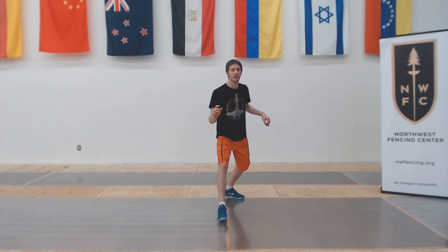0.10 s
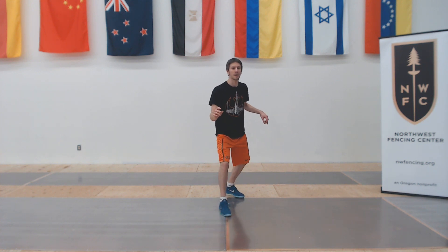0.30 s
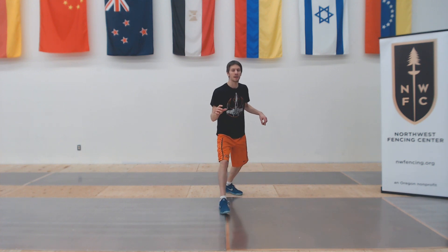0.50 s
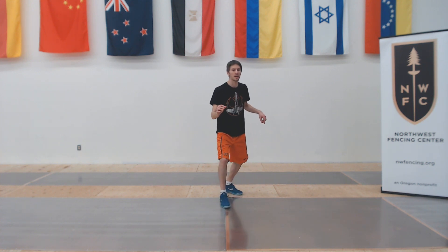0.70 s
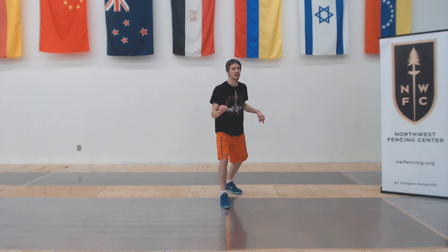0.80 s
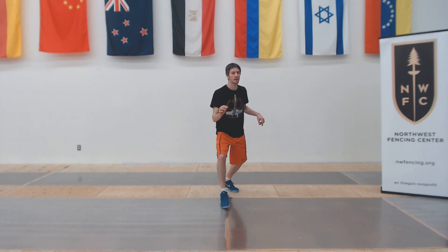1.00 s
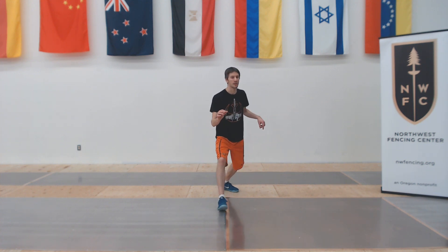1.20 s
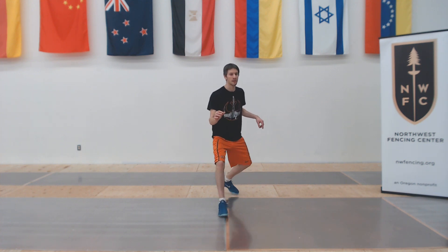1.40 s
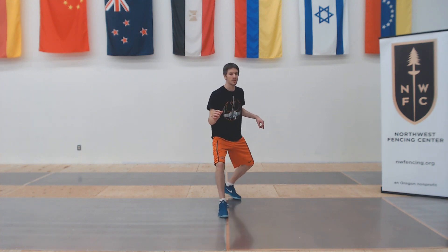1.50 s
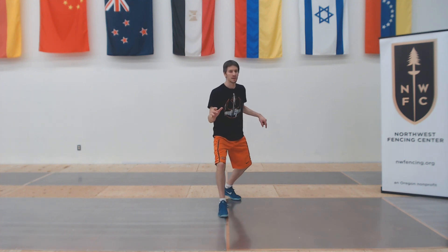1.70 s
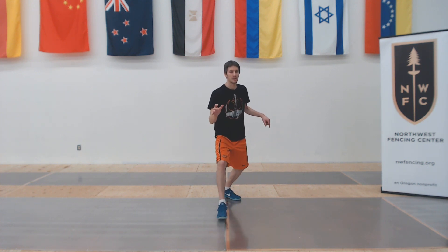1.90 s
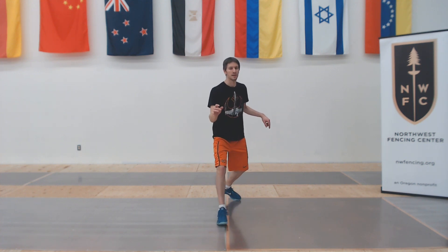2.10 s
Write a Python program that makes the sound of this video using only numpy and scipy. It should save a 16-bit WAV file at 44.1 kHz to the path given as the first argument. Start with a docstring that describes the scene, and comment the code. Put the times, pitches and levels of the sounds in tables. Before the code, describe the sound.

A rubber shoe sole squeaks sharply twice on a hall floor, amid soft scuffs and thuds

```python
"""A rubber sole squeaks twice in a large sports hall, while shoes scuff and pad softly before, between and after.
Each squeak is a pair of short stick-slip tones; an earlier one is still fading at the start.
Scuffs are gritty filtered noise; footfalls add a damped low sine to noise knocks and ticks.
The hall answers by convolution with echoes and a tail of over a second in the squeaks' range.
Ventilation lies underneath as wavering hum tones, low rumble and faint hiss."""
import sys
import numpy as np
from scipy import signal
from scipy.fft import rfft, irfft, next_fast_len
from scipy.io import wavfile

SR = 44100
rng = np.random.default_rng(int(sys.argv[2]) if len(sys.argv) > 2 else 0)


def unload_wav(signal):
    """Save mono or channel-first audio to the path in sys.argv[1] as 16-bit WAV at rate SR, clipped to [-1, 1]."""
    wavfile.write(
        sys.argv[1],
        SR,
        np.round(np.clip(np.atleast_2d(signal).T, -1, 1) * 32767).astype(np.int16),
    )


N = 94815
LEAD_S = 0.8  # least time computed ahead of zero, so that earlier sound can ring on
LEAD = next_fast_len(N + int(LEAD_S * SR), True) - N
T = (np.arange(N + LEAD) - LEAD) / SR  # scene time, s
EVENT_S = 0.25  # room for one contact
AGE = np.arange(int(EVENT_S * SR)) / SR  # time since an event began, s


def undb(db):
    """Amplitude ratio from a level: 20 dB is a factor of ten."""
    return 10 ** (np.asarray(db) / 20)


def unit(x):
    """Normalize the mean power: rms 1."""
    return x / np.sqrt(np.mean(x ** 2))


def unit_energy(x):
    """Normalize the total energy of an impulse response to 1."""
    return x / np.sqrt(np.sum(x ** 2))


def freqs(x):
    """Spectral frequency axis in Hz, floored at 1 Hz to allow logarithms."""
    return np.maximum(np.fft.rfftfreq(len(x), 1 / SR), 1)


def along(points, hz):
    """Interpolate (Hz, value) points linearly in log frequency, hence evenly per octave."""
    f, v = np.array(points, float).T
    return np.interp(np.log(hz), np.log(f), v)


def noise(t, gain):
    """Spectral shaping: white noise weighted at each frequency, rms 1."""
    spectrum = rfft(rng.standard_normal(len(t)))
    return unit(irfft(spectrum * gain, len(t)))


def wander(t, hz):
    """Random modulation: low-passed noise up to a rate, rms 1."""
    return noise(t, 1 / (1 + (freqs(t) / hz) ** 4))


def envelope(length, attack, release):
    """Linear rise, hold until a given age, then exponential decay."""
    rise = np.clip(AGE / attack, 0, 1)
    return rise * np.exp(-np.maximum(AGE - length, 0) / release)


def add(track, start, sound):
    """Superposition: mix a sound into a track from its start time."""
    part = track[max(LEAD + int(start * SR), 0):][:len(sound)]
    part += sound[:len(part)]


def squeaks():
    """Stick-slip friction: a jittery falling tone with two overtones, amid the rasp of uneven slipping."""
    # slips of the sole, a bright and a duller one per squeak in the scene; the last three columns are
    # relative to the fundamental:
    # start_s, length_s, pitch_hz, sag_hz_per_s, level_db, octave_db, third_harmonic_db, rasp_db
    slips = [(-0.59, .025, 4130, 8000, -16.5, -3, -5, -19),
             (.2220, 0.018, 4260, 21000, -12.5, -3, -18.5, -11),
             (.2375, .014, 4290, 15000, -8, -17, -29.5, -10.5),
             (.6880, 0.02, 4390, 14000, -11.5, -5.5, -26, -17.5),
             (.7040, .012, 4380, 9900, -11.5, -17.5, -27.5, -12)]
    # colour of the rasp: frequency_hz, relative_level_db
    rasp_colour = [(1500, -41.5), (2200, -28), (2950, -6), (3350, -15.5), (4100, -3), (5000, 4.5),
                   (5900, 1.5), (6450, -9.5), (7100, -4), (8500, -6.5), (9500, -10.5), (10700, -24.5),
                   (12500, -15), (15500, -36.5)]
    attack_s, release_s = 0.0061, 0.0069
    jitter, jitter_hz = 0.022, 600  # rms fraction of the pitch, and its rate
    flutter_db, flutter_hz = 2.5, 349  # greatest swing of level, and its rate
    out = np.zeros(len(T))
    rasp_gain = undb(along(rasp_colour, freqs(AGE)))
    for start, length, hz, sag, db, octave_db, third_db, rasp_db in slips:
        falling = hz - sag * np.minimum(AGE, length)
        pitch = falling * (1 + jitter * wander(AGE, jitter_hz))
        phase = 2 * np.pi * np.cumsum(pitch) / SR
        octave = undb(octave_db) * np.sin(2 * phase)
        third = undb(third_db) * np.sin(3 * phase)
        tone = np.sin(phase) + octave + third
        grip = undb(flutter_db * np.tanh(wander(AGE, flutter_hz)))
        rasp = undb(rasp_db) * noise(AGE, rasp_gain)
        slip = np.sqrt(2) * tone * grip + rasp
        add(out, start, undb(db) * slip * envelope(length - release_s, attack_s, release_s))
    return out


def scuffs():
    """Sliding friction: a brushing sole excites broadband noise, modulated by grains of dust and tread."""
    # brushes of a sole; the tilt applies above the middle frequency:
    # start_s, length_s, level_db, treble_db_per_octave
    brushes = [(0.037, 0.014, -62, -19), (0.093, 0.013, -58, -2), (.188, 0.084, -46.5, -7),
               (0.398, 0.033, -54, 3), (0.545, 0.021, -60, -4), (0.653, .04, -51, -1),
               (0.869, 0.052, -54.5, 2), (0.995, 0.02, -48.5, -10), (1.178, 0.023, -56, -2),
               (1.513, .02, -51.5, -13), (1.523, 0.014, -48, 1.5), (1.828, .025, -59.5, -9),
               (1.982, 0.019, -58.5, -2)]
    # colour of a scuff before the tilt: frequency_hz, relative_level_db
    scuff_colour = [(800, -7.5), (1900, -14.5), (2900, -13), (3500, -9.5), (5200, -1.5), (8000, 0),
                    (9700, -6), (10800, -13), (12800, -7.5), (15500, -17)]
    middle_hz = 7000
    attack_s, release_s = 0.006, 0.016
    grit_db, grit_hz = 5, 450  # greatest swing of level before normalizing, and its rate
    out = np.zeros(len(T))
    colour_db = along(scuff_colour, freqs(AGE))
    octaves_up = np.log2(np.maximum(freqs(AGE) / middle_hz, 1))
    for start, length, db, treble_db in brushes:
        grit = unit(undb(grit_db * np.tanh(wander(AGE, grit_hz))))
        rub = grit * noise(AGE, undb(colour_db + treble_db * octaves_up))
        add(out, start, undb(db) * rub * envelope(length, attack_s, release_s))
    return out


def steps():
    """Impact excitation: the sole ticks, the boards knock and the sprung floor thuds as a damped mode."""
    # contacts of heel or toe: start_s, thud_db, knock_db, tick_db
    contacts = [(0.191, -27.5, -45.5, -56), (0.394, -54.5, -34.5, -69), (.405, -50.5, -36.5, -54.5),
                (.648, -41, -56, -53), (0.858, -33, -43, -56), (0.871, -42, -36.5, -62),
                (1.181, -43, -67, -52.5), (1.4, -34, -49, -67), (1.519, -40, -50, -66),
                (1.982, -30, -47.5, -48), (2.142, -43.5, -36.5, -53.5)]
    # colour of the floor's knock: frequency_hz, relative_level_db
    knock_colour = [(80, -6), (180, -0.5), (350, -3.5), (520, -12.5), (750, -15), (1200, -19.5),
                    (2500, -39.5), (6000, -58)]
    # colour of the sole's tick: frequency_hz, relative_level_db
    tick_colour = [(300, -5.5), (1100, 6.5), (1800, -6), (2800, 1.5), (4500, -8), (9000, -11.5),
                   (15000, -30)]
    thud_hz, thud_decay_s = 85.75, 0.041
    knock_rise_s, knock_decay_s, tick_decay_s = 0.001, 0.0037, 0.0037
    out = np.zeros(len(T))
    boards = undb(along(knock_colour, freqs(AGE)))
    sole = undb(along(tick_colour, freqs(AGE)))
    thud = np.sin(2 * np.pi * thud_hz * AGE) * np.exp(-AGE / thud_decay_s)
    knock_shape = envelope(2 * knock_rise_s, knock_rise_s, knock_decay_s)
    tick_shape = envelope(tick_decay_s, tick_decay_s / 10, tick_decay_s)
    for start, thud_db, knock_db, tick_db in contacts:
        knock = noise(AGE, boards) * knock_shape
        tick = noise(AGE, sole) * tick_shape
        add(out, start, undb(thud_db) * thud + undb(knock_db) * knock + undb(tick_db) * tick)
    return out


def hall(x):
    """Reverberation as convolution: wall echoes, an early wash and a tail with its own decay per band."""
    # wall reflections, before the treble loss: delay_s, gain_db
    echoes = [(.015, -9), (0.037, -11.5), (.052, -14)]
    # time for the tail to fall by 60 dB: frequency_hz, t60_s
    hall_t60 = [(100, 1.1), (1000, 1.6), (3000, 1.9), (4100, 1.256), (5800, 0.89), (8400, 0.88),
                (12500, 0.36), (16000, 0.23)]
    echo_smear_s, early_db, early_s = 0.003, -10, 0.04
    tail_db, build_s = -11.5, 0.015
    treble_hz, treble_db = 4300, -9  # above this the hall returns less, dB per octave
    t, f = T - T[0], freqs(T)

    # tail: overlapping bands of one noise, each decaying at its own rate
    chance = rfft(rng.standard_normal(len(T)))
    centres = np.r_[100, 500, 1500, np.geomspace(3000, 16000, 10)]
    tail = 0
    for hz, share in zip(centres, np.eye(len(centres))):
        band = irfft(chance * np.interp(f, centres, share), len(T))
        tail = tail + band * np.exp(-np.log(1000) * t / along(hall_t60, hz))
    tail = tail * (1 - np.exp(-t / build_s))

    wash = rng.standard_normal(len(AGE)) * (1 - np.exp(-AGE / build_s))
    early = undb(early_db) * unit_energy(wash * np.exp(-AGE / early_s))
    for delay, db in echoes:
        smear = (AGE > delay) * np.exp(-np.abs(AGE - delay) / echo_smear_s)
        wall = rfft(rng.standard_normal(len(AGE)) * smear)
        size = np.abs(wall)
        flat = wall / (size + size.mean() / 10)  # nearly even spectrum, random phase
        early = early + undb(db) * irfft(flat, len(AGE))

    response = undb(tail_db) * unit_energy(tail) + np.pad(early, (0, len(T) - len(AGE)))
    dull = undb(treble_db * np.log2(np.maximum(f / treble_hz, 1)))
    response = irfft(rfft(response) * dull, len(T))[:N]
    return x + signal.fftconvolve(x, response)[:len(T)]


def ventilation():
    """Tonal and broadband noise: frequency-modulated hum, low duct rumble and the hiss of the room."""
    # hum tones, level before the waver and the slow changes: frequency_hz, level_db
    hum_tones = [(65.3, -32), (88, -44.5)]
    # slow changes in the level of the hum: time_s, gain_db
    hum_level = [(0, -1.5), (1.55, 0), (2.15, -7.5)]
    # colour of the duct rumble before its treble loss: frequency_hz, relative_level_db
    duct_colour = [(20, -3), (34, 4.5), (48, -3), (75, -9.5), (105, -11.5), (135, -17), (190, -26),
                   (290, -33.5), (600, -33), (1200, -30.5), (1400, -35), (1820, -63)]
    # colour of the hiss: frequency_hz, relative_level_db
    hiss_colour = [(300, 0), (700, -6), (1300, 1), (1650, -10.5), (2000, -11.5), (2900, -10.5),
                   (3450, -22.5), (4200, -15), (5500, -16.5), (8000, -20.5), (10500, -26), (15500, -25.5)]
    rumble_db, hiss_db = -35, -58.5
    waver, waver_db, waver_hz = 0.025, 0.45, 3.7  # rms fraction of pitch, rms of level, rate
    hum, f = 0, freqs(T)
    for hz, db in hum_tones:
        pitch = hz * (1 + waver * wander(T, waver_hz))
        phase = 2 * np.pi * np.cumsum(pitch) / SR
        level = undb(db + waver_db * wander(T, waver_hz))
        hum = hum + np.sqrt(2) * np.sin(phase) * level
    hum = hum * undb(np.interp(T, *np.array(hum_level).T))
    treble_loss = 1 / (1 + (f / 900) ** 2)
    rumble = noise(T, undb(along(duct_colour, f)) * treble_loss)
    hiss = noise(T, undb(along(hiss_colour, f)))
    return hum + undb(rumble_db) * rumble + undb(hiss_db) * hiss


def scene():
    """Superposition: footwork heard through the hall, over the ventilation."""
    footwork = squeaks() + scuffs() + steps()
    return (hall(footwork) + ventilation())[None, LEAD:]


def record(dry):
    """Band limiting: a steep elliptic low-pass cuts the top of the treble."""
    top_hz, ripple_db, rejection_db = 15800, 0.2, 80
    low_pass = signal.ellip(10, ripple_db, rejection_db, top_hz, fs=SR, output="sos")
    return signal.sosfilt(low_pass, dry)


dry = scene()
out = record(dry)
unload_wav(out)
```